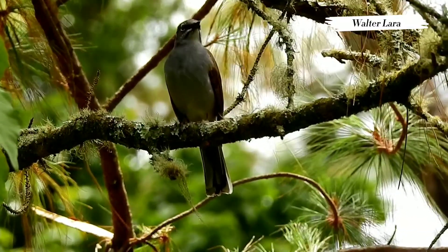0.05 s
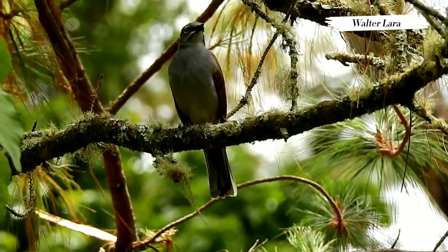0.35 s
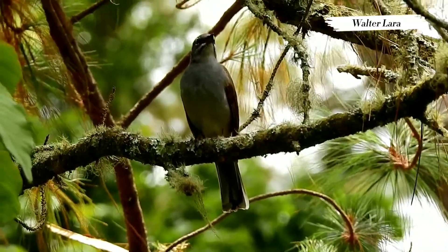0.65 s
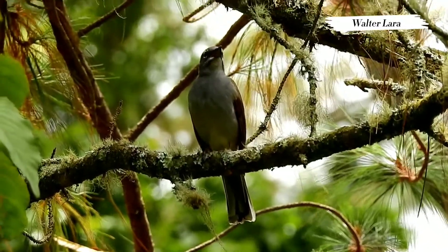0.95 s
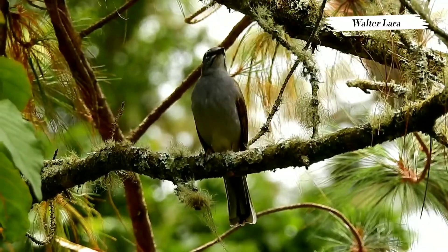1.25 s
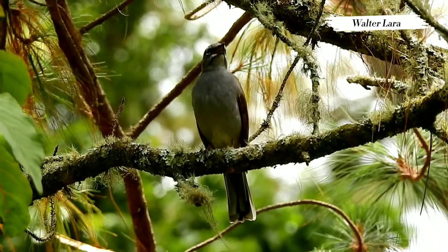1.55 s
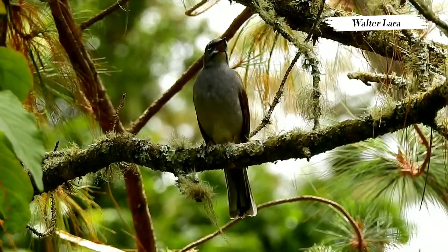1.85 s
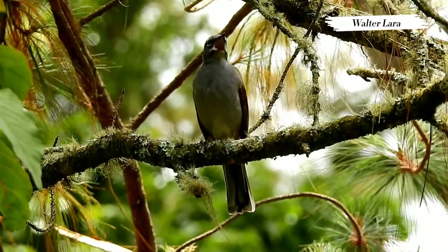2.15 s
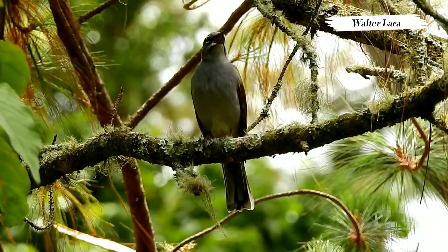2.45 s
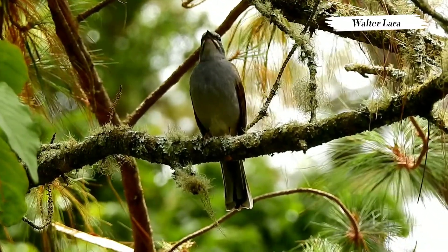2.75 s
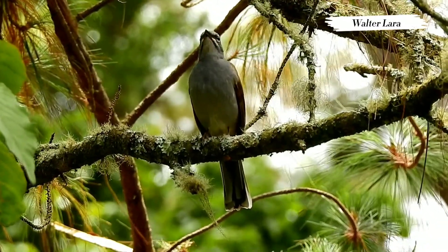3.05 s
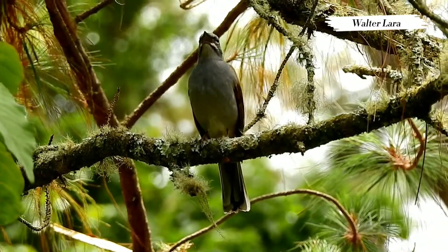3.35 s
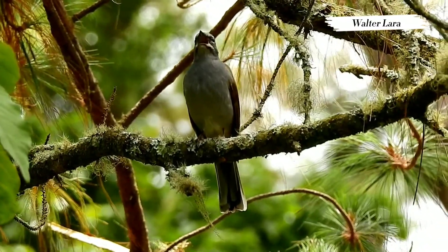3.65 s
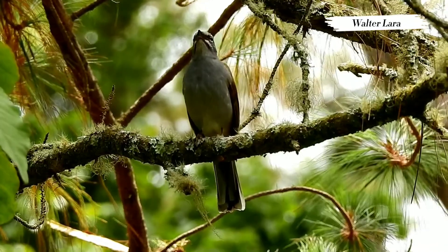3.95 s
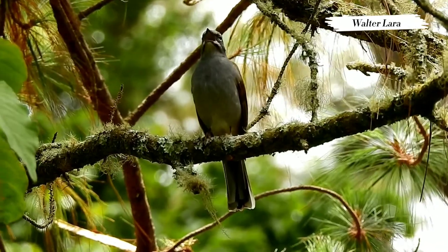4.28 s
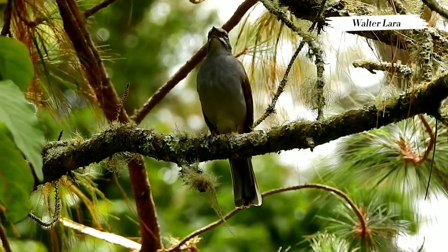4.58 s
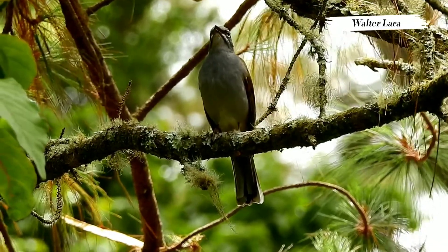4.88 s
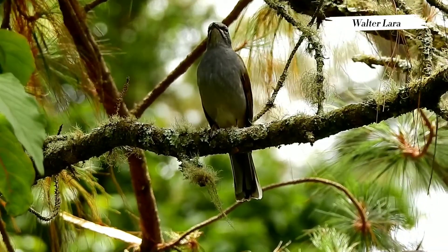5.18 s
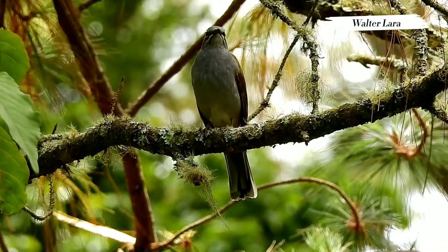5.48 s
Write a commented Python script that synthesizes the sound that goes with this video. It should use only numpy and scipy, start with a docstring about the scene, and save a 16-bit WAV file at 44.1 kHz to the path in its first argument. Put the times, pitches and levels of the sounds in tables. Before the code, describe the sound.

In a pine forest, a bird a few metres away pours out quick, high twittering trills mixed with hard little chips and one short two-toned note. The song finishes with several thin whistles that slide in pitch and echo lightly off the trunks. Underneath are a quiet, steady hiss, a far rumble and the low hum of a distant engine.

```python
"""A thrush-like bird sings a fast jangling song from a pine branch, a few metres from a close microphone pair.
Both sides of its syrinx throw trills of tiny U-shaped scoops, hold a few notes and once sound together.
Thin sliding whistles carry through the trees, and there are two small dry ticks. Branches and trunks
scatter it all; behind it lie a far rumble, a steady hiss, a motor drone and a faint whine."""
import sys
import numpy as np
from scipy import signal
from scipy.fft import rfft, irfft
from scipy.io import wavfile

SR = 44100
rng = np.random.default_rng(int(sys.argv[2]) if len(sys.argv) > 2 else 0)


def unload_audio(sound):
    """Save the sound as a 16-bit wav file, at the path given as the first command line argument."""
    columns = np.transpose(np.atleast_2d(sound))
    # keep every value between -1 and 1, then stretch to whole-number steps
    steps = np.round(np.clip(columns, -1, 1) * 32767)
    wavfile.write(sys.argv[1], SR, steps.astype(np.int16))


N = 252163
TIME = np.arange(N) / SR


def undb(db):
    """Decibels to gain."""
    return 10 ** (np.asarray(db) / 20)


def unit(x):
    """Scale to rms 1."""
    return x / np.sqrt(np.mean(x ** 2))


def gain_at(hz, points):
    """Read a (Hz, dB) spectrum as a gain."""
    f, db = np.transpose(points)
    return undb(np.interp(np.log(np.maximum(hz, 1)), np.log(f), db))


def colour(x, points):
    """Filter by a (Hz, dB) spectrum."""
    size = x.shape[-1]
    return irfft(rfft(x) * gain_at(np.fft.rfftfreq(size, 1 / SR), points), size)


def walk(rate, size=N):
    """Smooth random wander with a spread near 1, turning rate times a second."""
    steps = rng.standard_normal(int(size * rate / SR) + 2)
    return 1.039 * np.interp(np.arange(size) * rate / SR, np.arange(len(steps)), steps)


def add(out, start, x):
    """Mix a sound in at a start time in seconds."""
    i = max(int(start * SR), 0)
    out[i:i + len(x)] += x[:max(N - i, 0)]


def glide(rows):
    """Turn a note's timed rows into its start, a soft-edged gate and a curve for each further column."""
    s, *columns = np.transpose(rows)
    t = np.arange(s[0], s[-1], 1 / SR)
    edge_s = np.minimum(t - s[0], s[-1] - t)
    gate = np.sin(np.pi / 2 * np.clip(edge_s / .0021, 0, 1)) ** 2
    return s[0], gate, [np.interp(t, s, c) for c in columns]


def phase_of(hz):
    """Running phase of a pitch curve."""
    return 2 * np.pi * np.cumsum(hz) / SR


def close_pair(mid, side, width_db):
    """Diffuse sound on two close capsules: alike in the bass, unrelated in the treble."""
    side = colour(side, [(300, -24), (1500, -17.5), (3500, -12.5), (6000, 0), (12000, -2.5)])
    side *= undb(width_db)
    return np.array([mid + side, mid - side])


def forest_air():
    """A far rumble and a steady hiss from all round the microphones, each swelling very slightly."""
    # Spectra of the rumble and the hiss. Each row: frequency in Hz, relative density in dB.
    rumble = [(20, -15.5), (110, 3.5), (220, -0.5), (400, -8), (530, -5), (680, -5.5), (780, -9.5),
              (1050, -17), (1700, -19.5), (2600, -28.5), (5000, -41.5)]
    hiss = [(1500, -5), (4000, 8), (7000, 7), (15000, -31)]
    out = np.zeros((2, N))
    for spectrum, db, width_db in ((rumble, -41, 3), (hiss, -53, 3.5)):
        mid, side = unit(colour(rng.standard_normal((2, N)), spectrum))
        out += close_pair(mid, side, width_db) * undb(db + .6 * walk(7))
    return out


def motor(gain_db, wobble):
    """A far engine: little more than its firing tone gets through the trees."""
    # The engine's course. Each row: time in seconds, firing rate in Hz, relative level in dB.
    course = [(0, 80, -60), (.68, 82, -50), (.88, 82, -38), (1.88, 82, -37.5), (2.02, 82, -56),
              (2.5, 81, -38.5), (3.35, 79, -40), (4.25, 63, -47.5), (5.72, 62, -47)]
    s, *columns = np.transpose(course)
    hz, db = (np.interp(TIME, s, c) for c in columns)
    level = undb(db + gain_db + 1.3 * walk(14))
    return level * unit(np.sin(phase_of(hz * (1 + wobble * walk(29)))))


def whine(hz, db, wobble, swell_db, swell_at_s, swell_s):
    """A faint far tone that swells once and otherwise wavers."""
    swell = swell_db * np.exp(-((TIME - swell_at_s) / swell_s) ** 2)
    level = undb(db + swell + 3 * walk(4))
    return level * np.sin(phase_of(hz * (1 + wobble * walk(24))))


def syrinx(hz, second_db, third_db):
    """A nearly pure tone whose weak overtones sweep through the throat resonances."""
    # Colour of the throat and beak. Each row: frequency in Hz, gain in dB.
    throat = [(2400, -1.5), (3000, -0.5), (3850, 0.5), (5000, -1.5), (6300, 3), (7200, -3), (8200, -12.5),
              (9400, 3.5), (10300, -2.5), (11400, -26), (15000, -39)]
    phase = phase_of(hz)
    return sum(undb(db) * gain_at(k * hz, throat) * (k * hz < SR / 2) * np.sin(k * phase)
               for k, db in enumerate((0, second_db, third_db), 1))


def trills(table, bend, ceiling_hz, scatter, scatter_db):
    """Spell trills out as scoops (s, Hz, dB, bend); low scoops have the most room to bend upward."""
    scoops_per_s, faster_per_db, effort_db = 82, .022, -12  # harder singing brings faster scoops
    crest, sag_db = .55, 9  # a trill crests just past its middle and sags at both ends
    lowest_hz = 2737
    notes = []
    for (start, span, hz, climb, db), chance in zip(table, rng.standard_normal((len(table), 2, 16))):
        haste = 1 + faster_per_db * (db - effort_db)
        count = 1 + max(round(span * scoops_per_s * haste), 1)
        along = (np.arange(count) + .5) / count
        sag = sag_db * (2 * (along - crest)) ** 2
        pitch = np.maximum(hz * (1 + climb * (along - .5) + scatter * chance[0, :count]), lowest_hz)
        level = db - sag + sag.min() + scatter_db * chance[1, :count]
        bends = np.minimum(bend, ceiling_hz / pitch - 1)
        notes += zip(np.linspace(start, start + span, count), pitch, level, bends)
    return notes


def scoops(notes, length_s, dip, skew, sharp, second_db, third_db, rough,
           rasp_db, snap_db, snap_s, answer_hz, answer_db, answer_s):
    """While the valve is open the pitch dips, then whips upward; a negative bend turns the U over."""
    # Turbulent rasp as it leaves the throat. Each row: frequency in Hz, gain in dB.
    rasp_colour = [(1500, -49), (2500, -42), (3800, 4.5), (6300, -2), (8200, -6.5), (9600, -1),
                   (11800, -36)]
    perch_db = -10
    out, rasps = np.zeros((2, N))
    t = np.arange(int(length_s * SR)) / SR
    along = t / t[-1]
    scoop = ((along - dip) / (1 - dip)) ** 2
    opening = np.abs(np.sin(np.pi * along ** skew))
    widest_s = length_s * .5 ** (1 / skew)
    turbulence, flutter = rng.standard_normal(N), walk(2010)
    push, path, answer_drift, answer_swell = (walk(70) for _ in range(4))
    for s, pitch, db, bend in notes:
        start, i = s - widest_s, int(s * SR)
        force = abs(bend) * (1 + .17 * push[i])
        hz = pitch * (1 + np.sign(bend) * force * scoop)
        hz *= 1 + rough * force * flutter[i:i + len(t)]
        # a hard scoop is brief and raspy, and snaps where the valve is widest
        gate = opening ** (1 + sharp * force)
        snap = np.exp(-np.abs(t - widest_s) / snap_s)
        rasp = force * turbulence[i:i + len(t)] * (undb(rasp_db) * gate + undb(snap_db) * snap)
        add(rasps, start, undb(db) * rasp)
        note = undb(db) * gate * syrinx(hz, second_db, third_db)
        add(out, start, note)
        # the perch and nearby twigs throw it back, by a path that shifts as the bird turns its head
        add(out, start + .005 + .003 * np.tanh(path[i]), undb(perch_db) * note)
        # the other side of the syrinx answers softly between the scoops
        answer_pitch = answer_hz * (1 + .0425 * answer_drift[i]) * (1 + .11 * scoop)
        answer = opening ** 2 * np.sin(phase_of(answer_pitch))
        add(out, start + answer_s, undb(db + answer_db + 3.5 * answer_swell[i]) * answer)
    return out + colour(rasps, rasp_colour)


def purrs():
    """Warbling trills, so shallow that they stay near one pitch."""
    # Each row: start in seconds, length in seconds, pitch in Hz, climb as a share of the pitch,
    # relative level in dB.
    shallow_trills = [(.037, 0.014, 2950, -0.018, -31), (.19, 0.013, 2920, 0, -23.5),
                      (.282, 0.011, 3010, 0.072, -27), (.484, 0.0096, 2930, 0.051, -21),
                      (.744, 0.093, 2987, -0.0092, -24), (.831, 0.032, 6080, 0.031, -25),
                      (1.015, 0.011, 3064, -0.024, -19.5), (1.329, 0.012, 2900, -0.083, -25),
                      (1.522, 0.11, 5270, -0.0056, -26), (1.683, 0.014, 5590, 0.0068, -16.5),
                      (1.738, 0.0164, 2810, -0.033, -24.5), (2.443, 0.037, 4660, -0.0036, -12),
                      (2.494, 0.035, 3640, -0.049, -15.5), (2.571, .02, 2980, .08, -26.5),
                      (2.607, .066, 2710, -0.027, -30), (3.013, 0.0097, 2920, -0.049, -26),
                      (3.138, .083, 2776, 0.053, -17), (4.027, .026, 3627, 0.033, -7.5),
                      (4.169, 0.019, 5200, -0.0086, -13.5), (4.438, 0.016, 2990, 0.0028, -20),
                      (4.55, 0.027, 6120, -0.0079, -22), (4.607, 0.01, 3030, 0.0086, -19),
                      (4.836, 0.033, 6040, 0.062, -22.5), (4.93, 0.014, 2940, 0.015, -24.5),
                      (4.983, 0.021, 5200, 0.025, -13)]
    notes = trills(shallow_trills, bend=.35, ceiling_hz=6800, scatter=.021, scatter_db=1.46)
    return scoops(notes, length_s=.0105, dip=.436, skew=1.1, sharp=3.2, second_db=-17, third_db=-21.5,
                  rough=.074, rasp_db=-14, snap_db=-3, snap_s=.0003,
                  answer_hz=3750, answer_db=-19, answer_s=.011)


def high_voice():
    """Bright trills and single hard chips from the high side of the syrinx."""
    # Each row: start in seconds, length in seconds, pitch in Hz, climb as a share of the pitch,
    # relative level in dB.
    high_trills = [(.113, 0.016, 5170, 0.13, -17.5), (1.982, 0.039, 5520, -0.09, -21.5),
                   (2.042, 0.021, 5330, 0, -19), (2.099, .049, 6400, -0.011, -20.5),
                   (2.7, 0.018, 5700, 0.085, -23.5), (2.745, 0.021, 4680, 0.016, -15),
                   (2.926, 0.034, 4450, .05, -17.5), (2.987, .011, 6480, -0.068, -18),
                   (3.023, 0.021, 5380, .1, -18), (3.067, .012, 4270, -0.027, -13.5),
                   (3.275, 0.015, 4890, 0.112, -9.5), (3.708, 0.0074, 5390, 0.17, -22),
                   (3.931, 0.077, 4586, 0, -9.5), (4.211, 0.016, 5180, -0.074, -9),
                   (4.684, 0.016, 6220, 0.19, -18.5), (4.749, .015, 5410, .02, -9.5)]
    # Each row: time in seconds, pitch in Hz, relative level in dB, bend as a share of the pitch.
    chips = [(.528, 5470, -12.5, 0.31), (0.627, 7200, -13.5, -0.22), (.729, 5500, -12, 0.37),
             (.924, 5970, -23.5, .6), (0.947, 7570, -9.5, -0.25), (1.093, 7020, -12, -0.27),
             (1.711, 5540, -11, 0.2), (4.361, 5020, -10, 0.38), (4.402, 5330, -10.5, 0.65),
             (4.492, 5550, -11.5, 0.38)]
    notes = trills(high_trills, bend=.515, ceiling_hz=7770, scatter=.018, scatter_db=.25) + chips
    return scoops(notes, length_s=.0095, dip=.45, skew=2.07, sharp=1.73, second_db=-12, third_db=-24,
                  rough=.044, rasp_db=-19.5, snap_db=6.5, snap_s=.00027,
                  answer_hz=3100, answer_db=-21.5, answer_s=.011)


def tones(notes, second_db, third_db, waver):
    """Clean unbroken notes from the syrinx, with a slight waver in pitch."""
    out = np.zeros(N)
    for rows in notes:
        start, gate, (hz, db) = glide(rows)
        hz = hz * (1 + waver * walk(319, size=len(hz)))
        add(out, start, gate * undb(db) * syrinx(hz, second_db, third_db))
    return out


def whistles():
    """Thin, almost pure whistles that slide in pitch, off among the trees."""
    # One list a whistle. Each row: time in seconds, pitch in Hz, relative level in dB.
    slides = [
        [(.13, 7700, -38), (.18, 6700, -34.5), (.27, 5600, -43)],
        [(3.476, 6300, -28.5), (3.505, 5760, -26.5), (3.535, 5870, -31)],
        [(3.74, 6600, -41), (3.82, 5850, -43), (3.895, 5570, -39)],
        [(5.035, 5700, -33), (5.08, 6480, -36), (5.098, 6785, -22.5), (5.15, 6790, -49)],
        [(5.32, 5950, -49), (5.355, 5340, -41), (5.4, 5240, -41), (5.46, 5790, -20.5), (5.52, 5800, -47)],
        [(5.543, 8050, -31), (5.565, 7200, -26.5), (5.592, 6480, -25.5), (5.625, 6130, -33)],
        [(5.672, 6030, -23), (5.688, 5600, -22.5), (5.702, 4700, -22.5), (5.718, 4670, -21)],
    ]
    return tones(slides, second_db=-47.5, third_db=-50, waver=.001)


def low_voice():
    """Jangling trills from the low side of the syrinx."""
    # Each row: start in seconds, length in seconds, pitch in Hz, climb as a share of the pitch,
    # relative level in dB.
    low_trills = [(.178, 0.068, 3720, 0.1, -19.5), (.32, 0.067, 3550, 0.075, -20.5),
                  (.466, 0.029, 3480, -0.19, -18.5), (.588, 0.017, 3570, 0.17, -23),
                  (.648, 0.013, 3440, 0.29, -17.5), (.744, .109, 3860, -0.095, -30),
                  (.972, 0.058, 3660, 0.19, -15), (1.116, .035, 3546, .2, -12.5),
                  (1.372, 0.037, 3850, .1, -14.5), (1.423, .036, 3186, 0.21, -19.5),
                  (1.728, 0.043, 3610, 0.028, -15), (1.793, 0.088, 3345, 0.18, -17.5),
                  (1.9, 0.021, 3630, .1, -18.5), (1.982, 0.028, 3360, .15, -19.5),
                  (2.038, 0.029, 3220, 0.22, -21), (2.077, 0.025, 3970, 0.16, -12.5),
                  (2.305, 0.014, 3510, -0.15, -20), (2.349, 0.0095, 3300, 0.44, -18.5),
                  (2.601, 0.0083, 3170, -0.42, -14), (2.697, 0.03, 3630, 0.12, -16.5),
                  (2.757, 0.038, 3510, 0.059, -14), (2.832, 0.067, 3536, 0.36, -15.5),
                  (2.913, 0.025, 3860, 0.08, -12), (3.1, 0.039, 3190, 0.23, -20),
                  (3.329, 0.035, 3580, 0.17, -11), (3.388, 0.047, 3476, -0.17, -17),
                  (3.57, .098, 3230, 0.014, -19.5), (3.708, 0.017, 3610, -0.046, -20.5),
                  (3.766, 0.047, 3704, -0.028, -10.5), (3.827, 0.027, 3160, -0.13, -18.5),
                  (3.895, 0.0079, 3490, 0.24, -17.5), (4.062, .026, 3430, -0.29, -15.5),
                  (4.132, 0.17, 3770, 0.055, -19.5), (4.277, 0.047, 4010, .15, -10),
                  (4.407, 0.065, 3600, -0.041, -15), (4.545, 0.04, 3360, 0.19, -20),
                  (4.594, 0.04, 3490, -0.16, -14.5), (4.693, 0.036, 3370, 0.23, -16),
                  (4.805, 0.06, 3650, -0.072, -25)]
    notes = trills(low_trills, bend=.8, ceiling_hz=5260, scatter=.035, scatter_db=1)
    return scoops(notes, length_s=.0098, dip=.384, skew=1.4, sharp=1.9, second_db=-16, third_db=-27.5,
                  rough=.1, rasp_db=-10.5, snap_db=-9.5, snap_s=.00016,
                  answer_hz=5700, answer_db=-19, answer_s=.00887)


def held_notes():
    """Three notes that the bird holds briefly between trills."""
    # One list a note. Each row: time in seconds, pitch in Hz, relative level in dB.
    notes = [
        [(.238, 3800, -24), (.255, 3730, -26.5), (.278, 3790, -27)],
        [(.667, 3105, -27), (.678, 3003, -15), (.698, 2994, -15), (.708, 3064, -18)],
        [(1.165, 2270, -41), (1.18, 1985, -33), (1.195, 1950, -49.5)],
    ]
    return tones(notes, second_db=-26, third_db=-26.5, waver=.0022)


def ticks():
    """Small dry cracks near the microphones, each a burst of noise around one resonance."""
    # Each row: start in seconds, resonance in Hz, level in dB, decay in seconds.
    cracks = [(1.223, 5500, -35.5, .003), (5.462, 1530, -37, 0.005)]
    out, t = np.zeros(N), TIME[:SR // 20]
    for start, hz, db, decay in cracks:
        crack = unit(colour(rng.standard_normal(len(t)), [(hz / 4, -30), (hz, 0), (hz * 3, -30)]))
        add(out, start, undb(db) * crack * np.exp(-t / decay))
    return out


def chord(upper_hz, lower_hz, waver, flutter_db):
    """The two voices drive each other; their sum tone meets the throat resonance and rings out."""
    # The effort that both voices share. Each row: time in seconds, relative level in dB.
    effort = [(2.12, -38), (2.15, -21), (2.172, -9.5), (2.208, -9.5), (2.222, -18), (2.252, -32)]
    # Tones of the coupled voices. Each row: multiple of the upper pitch, of the lower, gain in dB.
    coupled_tones = [(1, 0, -13.5), (0, 1, -21.5), (1, 1, -1.5), (0, 2, -11.5), (2, 0, -17), (1, 2, -26.5),
                     (2, 2, -46)]
    out = np.zeros(N)
    start, gate, (db,) = glide(effort)
    upper, lower = (phase_of(hz * (1 + waver * walk(900, size=len(db)))) for hz in (upper_hz, lower_hz))
    sound = sum(undb(tone_db) * np.sin(m * upper + n * lower) for m, n, tone_db in coupled_tones)
    add(out, start, gate * undb(db + flutter_db * walk(500, size=len(db))) * sound)
    return out


def direct(x, pan_db, lag_samples):
    """The straight path to the two capsules; positive settings make the left one louder and earlier."""
    turn = np.exp(2j * np.pi * np.fft.rfftfreq(N) * lag_samples / 2)
    spectrum = rfft(x)
    left = undb(pan_db / 2) * irfft(spectrum * turn, N)
    right = undb(-pan_db / 2) * irfft(spectrum / turn, N)
    return np.array([left, right])


def forest(x, near_db, near_s, far_db, far_t60_s):
    """Nearby branches return a brief spray of echoes; trunks further off leave a longer tail."""
    t = TIME[:SR]
    spray = rng.standard_normal((2, SR)) * (rng.random((2, SR)) < .05)
    branches = spray * np.exp(-t / near_s) * (t > .002)
    trunks = rng.standard_normal((2, SR)) * undb(-60 * t / far_t60_s) * (1 - np.exp(-t / .011))
    echoes = (undb(near_db) * unit(branches) + undb(far_db) * unit(trunks)) / np.sqrt(SR)
    return signal.fftconvolve(x[None], close_pair(*echoes, width_db=-3.5), axes=1)[:, :N]


def scene():
    """The song a few metres off, the whistles deeper in the trees, air and motor in the distance."""
    song = low_voice() + high_voice() + purrs() + held_notes()
    song += chord(upper_hz=3628, lower_hz=3196, waver=.008, flutter_db=1.3) + ticks()
    whistling = whistles()
    near = direct(song, pan_db=-1.3, lag_samples=.56)
    near += forest(song, near_db=-4, near_s=.021, far_db=-14, far_t60_s=.68)
    far = direct(whistling, pan_db=-.8, lag_samples=-2)
    far += forest(whistling, near_db=-1.5, near_s=.015, far_db=-3, far_t60_s=.735)
    background = forest_air()
    drone = motor(gain_db=-1.5, wobble=.012)
    drone += whine(hz=659, db=-53.5, wobble=.0079, swell_db=11, swell_at_s=.8, swell_s=.16)
    return near + far + background + direct(drone, pan_db=-2.5, lag_samples=0)


def record(dry):
    """The loudest peaks are softly rounded, and the recorder cuts the top above 15.4 kHz."""
    return signal.sosfilt(signal.ellip(12, .2, 70, 15400, fs=SR, output="sos"), np.tanh(dry))


dry = scene()
out = record(dry)
unload_audio(out)
```